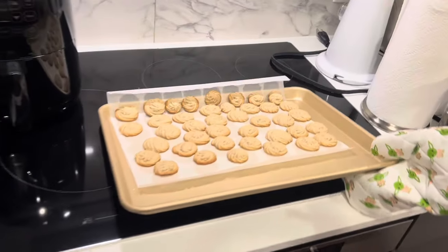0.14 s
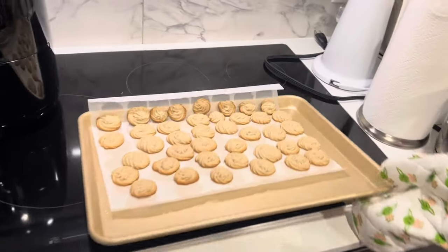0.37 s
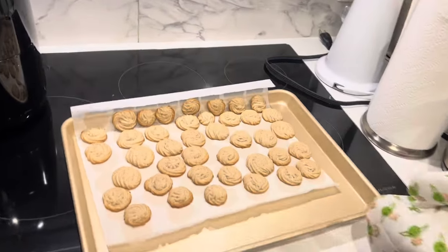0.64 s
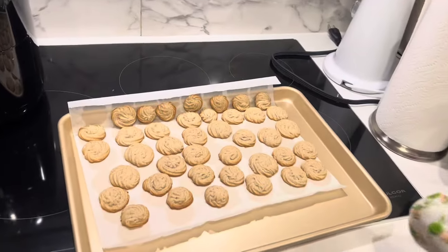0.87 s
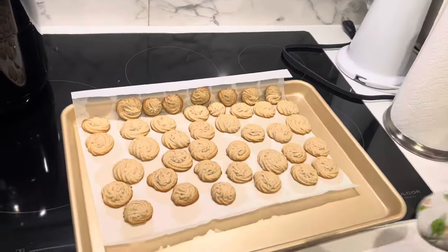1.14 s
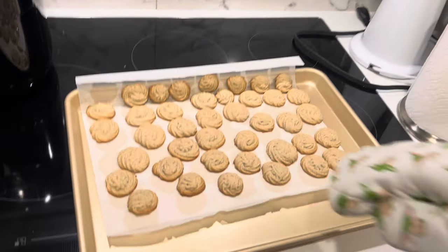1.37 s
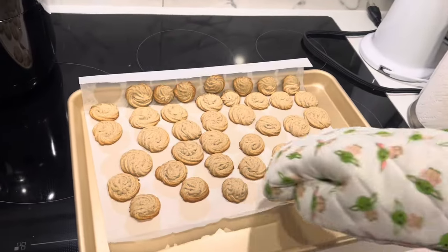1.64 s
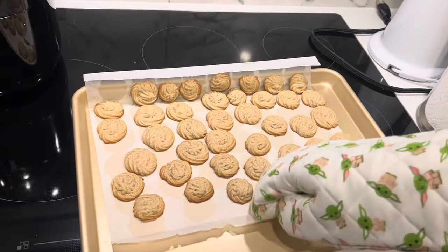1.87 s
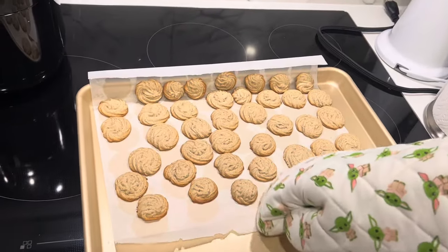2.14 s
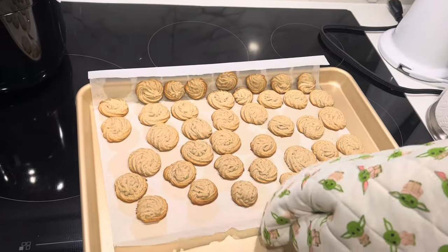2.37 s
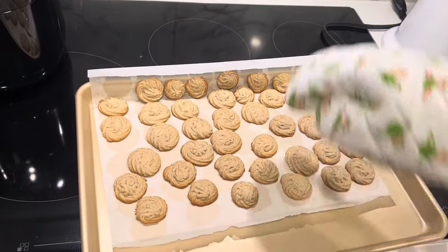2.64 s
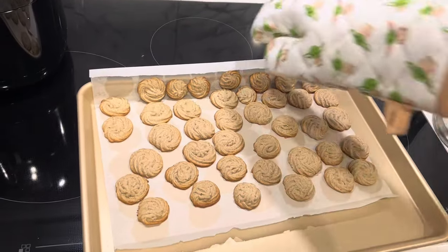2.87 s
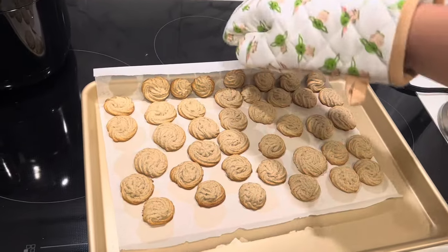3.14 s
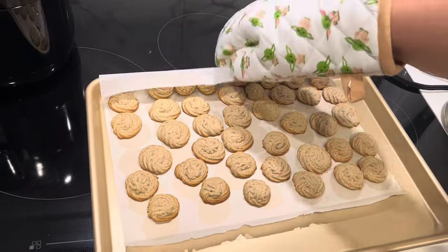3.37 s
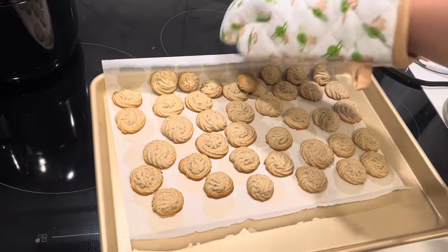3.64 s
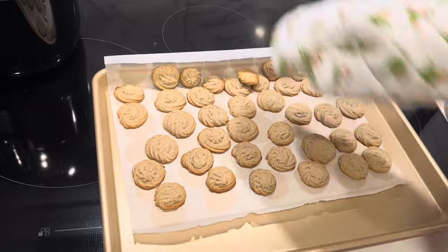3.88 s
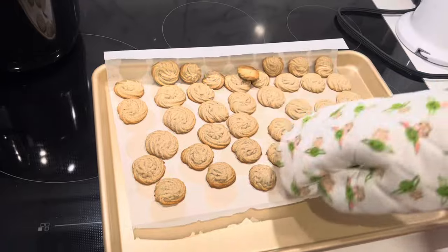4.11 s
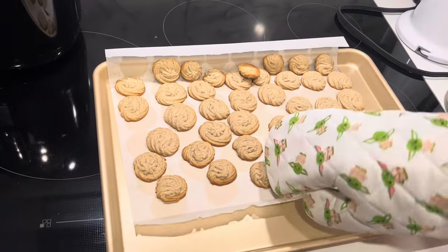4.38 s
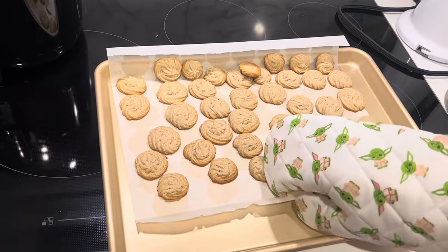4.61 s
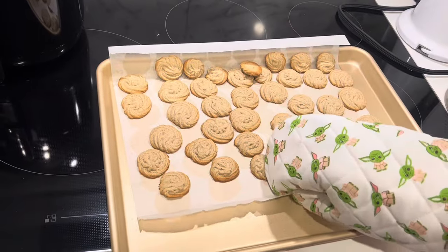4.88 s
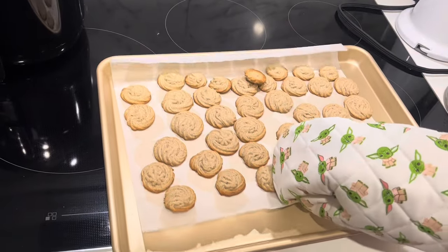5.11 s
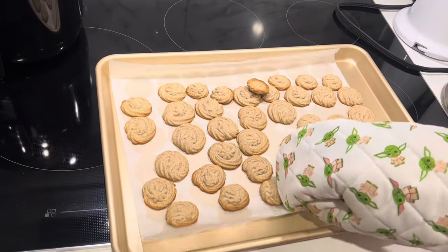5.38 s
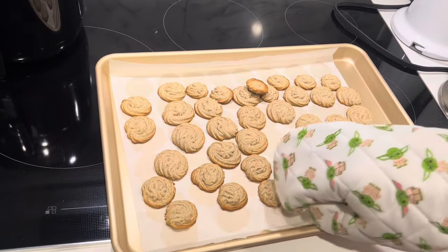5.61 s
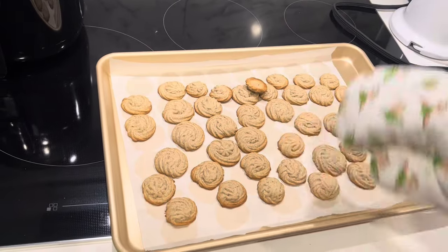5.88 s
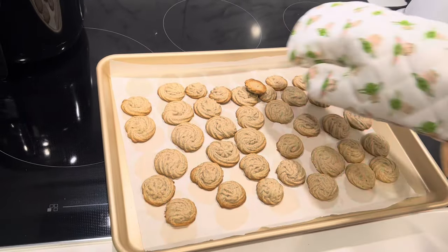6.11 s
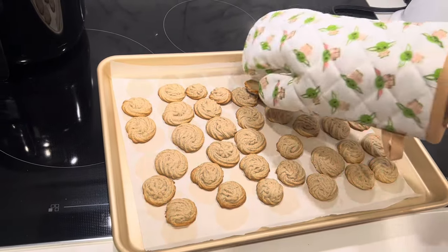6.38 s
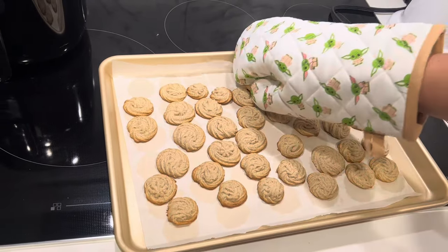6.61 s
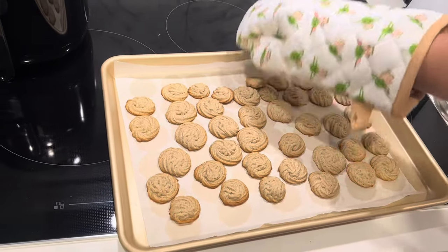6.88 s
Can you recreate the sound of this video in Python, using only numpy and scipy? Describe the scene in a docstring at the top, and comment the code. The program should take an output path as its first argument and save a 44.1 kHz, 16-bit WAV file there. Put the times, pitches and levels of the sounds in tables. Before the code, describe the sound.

A small hard-walled kitchen hisses quietly while fingers rumble softly on the handheld microphone. A metal baking sheet glides over glass and at about half a second drops with a very loud, bright clack that echoes briefly. After a pause, a padded mitt moves biscuits on baking paper: crisp crackles, short scrapes and light taps in separate bursts, with longer rustling near five seconds and a few quiet ticks at the end.

```python
"""A small kitchen hisses and a hand rumbles on the phone while a hot baking sheet glides over a glass cooktop.
At half a second the sheet drops flat with a clack: noisy blows ring its metal modes and the hard room echoes.
A faint steady tone near 3.5 kHz, a sine, follows. A padded mitt then nudges biscuits over baking paper:
crackles, short scrapes and taps, made of grainy noise in four bands, come in bursts up to the end.
Late on, a low wavering hum comes and goes."""
import sys
import numpy as np
from scipy import signal
from scipy.fft import rfft, irfft, next_fast_len
from scipy.io import wavfile
from scipy.ndimage import uniform_filter1d, map_coordinates

SR = 44100
rng = np.random.default_rng(int(sys.argv[2]) if len(sys.argv) > 2 else 0)


def boost_factor(decibels):
    """Convert a level in decibels to a linear amplitude factor."""
    exponent = np.asarray(decibels, float) / 20
    return 10 ** exponent


def unload_audio(sound):
    """Save the sound as a 16-bit wav file, at the path given as the first command line argument."""
    columns = np.transpose(np.atleast_2d(sound))
    # keep every value between -1 and 1, then stretch to whole-number steps
    steps = np.round(np.clip(columns, -1, 1) * 32767)
    wavfile.write(sys.argv[1], SR, steps.astype(np.int16))


N = 308700
T = np.arange(N) / SR
SIZE = next_fast_len(N + SR)  # room for a second of echo
HZ = np.fft.rfftfreq(SIZE, 1 / SR) + 1e-3  # just above zero, so that logs and divisions work

# what the free sheet rings with: f/Hz, width/Hz, level/dB
SHEET_MODES = [(251, 20, -4), (473, 39, 0), (664, 56, -10), (891, 69, -7.5), (1207, 49, -5.5),
               (1477, 66, -4.5), (1760, 220, -2), (1964, 180, 2.5), (2196, 99, 1), (2420, 130, 0.5),
               (2710, 100, 3), (2920, 99, 2), (4035, 120, -4), (4970, 120, -1.5), (6200, 330, -9),
               (6700, 220, -7.5), (7283, 150.7, -10)]
# paper pressed on the metal drums it; pulled taut it hardly does, and its creases go more slowly:
# t/s, drumming/dB, crease rise/ms
PAPER_CONTACT = [(0, -3, .3), (2.1, -7, 0.31), (2.3, -8, 1.2), (3.5, -9, 0.61), (4.7, -11.5, 0.37),
                 (5.0, -11.5, 1.6), (5.55, -20.5, 1.9), (5.8, -12, 0.31), (6.5, -1, 0.37)]
# how fast a stroke of the mitt, or a settling, swells
STROKE_RISE_DB_S = 900


def unit(x):
    """Scale to an rms of 1."""
    return x / np.sqrt(np.mean(x ** 2))


def curve(table):
    """Read the first two columns, time and value, at every sample."""
    return np.interp(T, *np.transpose(table)[:2])


def over_hz(table, hz=HZ):
    """Read a table of frequency and value on a log frequency axis."""
    f, value = np.transpose(table)
    return np.interp(np.log(hz), np.log(np.maximum(f, 1)), value)


def shape(x, response):
    """Filter by a frequency response."""
    return irfft(rfft(x, SIZE) * response, SIZE)[..., :N]


def modes(table):
    """Response of a body that rings at several pitches; neighbouring resonances have opposite sign."""
    total = 0
    for k, (f, width, db) in enumerate(table):
        resonance = 1j * HZ * width / (f * f - HZ ** 2 + 1j * HZ * width)
        total = total + (-1) ** k * boost_factor(db) * resonance
    return total


def band(lo_hz, hi_hz):
    """Soft-edged pass band."""
    return 1 / np.sqrt((1 + (lo_hz / HZ) ** 6) * (1 + (HZ / hi_hz) ** 6))


def walk(rate):
    """Smooth random curve, spread near 1: random levels held for 1 / rate s, then averaged twice."""
    hold = max(int(SR / rate), 1)
    steps = np.repeat(rng.standard_normal(N // hold + 1), hold)
    return 1.1 * uniform_filter1d(uniform_filter1d(steps, hold), hold)[:N]


def swell(start, length, db, rise_db_s, fall_db_s):
    """Gain that climbs to db at start, holds for length seconds and sinks away."""
    before = np.maximum(start - T, 0)
    after = np.maximum(T - start - length, 0)
    return boost_factor(db - rise_db_s * before - fall_db_s * after)


def slide():
    """Smooth metal on smooth glass: an even rush of noise, coloured by the singing glass."""
    # the glass top under the gliding rim: f/Hz, width/Hz, level/dB
    glass_modes = [(1810, 60, 12), (2300, 90, 8.5), (3095, 54, 12.5), (5090, 120, 8)]
    colour = abs(modes(glass_modes)) + boost_factor(4.5)
    colour = colour * (band(300, 8500) + boost_factor(-8.5) * band(13000, 14500))
    rush = shape(rng.standard_normal(N) * boost_factor(1.4 * walk(9.1)), colour)
    return unit(rush) * swell(0, 0.67, -60.5, rise_db_s=900, fall_db_s=200)


def kitchen():
    """Appliances: steady hiss that breathes a little, and late on a wavering low hum."""
    # colour of the hiss: f/Hz, level per Hz/dB
    hiss_colour = [(60, -47.5), (100, -10.5), (174, -8.5), (266, -11.5), (500, -20.5), (800, -28.5),
                   (1550, -27.5), (2040, -30.5), (2520, -39), (5300, -45), (7290, -27.5), (8800, -45.5),
                   (13000, -46.5), (14800, -54), (16000, -77.5)]
    # left-right difference (side) against the common part (mid): f/Hz, side minus mid/dB
    hiss_width = [(60, -21.5), (200, -12.5), (400, -8), (800, -6.5), (1400, 4.5), (2400, -7), (4400, -2),
                  (6000, -7.5), (7300, -18), (9000, -5.5), (15000, -7.5)]
    # the hiss dips briefly; rms of the common part, before the breathing: t/s, level/dB
    hiss_level = [(0, -60), (.5, -60.5), (1.2, -65.5), (2.6, -65.5), (4.2, -64.5), (5.05, -63.5),
                  (5.3, -63.5), (5.53, -75), (5.6, -66), (7, -67.5)]
    hum_hz = 170

    mid = shape(rng.standard_normal(N), boost_factor(over_hz(hiss_colour)))
    side = shape(rng.standard_normal(N), boost_factor(over_hz(hiss_colour) + over_hz(hiss_width)))
    breathing = boost_factor(curve(hiss_level) + 1.5 * walk(4.37))
    hiss = np.array([mid + side, mid - side]) / mid.std() * breathing

    hum_phase = 2 * np.pi * np.cumsum(hum_hz + 8 * walk(23)) / SR  # the pitch wavers
    hum = np.sqrt(2) * np.sin(hum_phase) * boost_factor(2.8 * walk(3.4))
    hum = hum * swell(5.62, 0.08, -67, rise_db_s=200, fall_db_s=10)
    hum = hum * swell(0, 6.2, 0, rise_db_s=0, fall_db_s=100)  # ends faster after 6.2 s
    return hiss + hum


def grip():
    """Fingers press and slip on the phone case: low rumble, nearly the same at both ports."""
    # the hand is tenser while reaching: t/s, level/dB
    grip_level = [(0, -64.5), (.9, -53), (1.4, -62), (2.6, -60), (3.5, -55), (4.05, -64.5), (4.55, -55.5),
                  (5.45, -70.5), (6.2, -73), (7, -65)]
    # colour of the rumble: f/Hz, level per Hz/dB
    grip_colour = [(15, -35.5), (28, -11.5), (40, -5), (54, -0.5), (72, 0.5), (113, -15), (200, -22),
                   (300, -45), (500, -100)]
    # fingers slip on the case: start t/s, length/s, level/dB
    slips = [(0, 0.0067, -39), (0.228, 0.017, -49.5), (0.461, 0.041, -52), (0.558, 0.019, -36),
             (1.494, 0.0095, -51), (1.81, 0.039, -60.5), (1.96, 0.0063, -49), (2.146, 0.023, -53.5),
             (2.52, 0.035, -59), (2.839, .09, -61), (2.973, 0.013, -50), (3.205, .03, -55),
             (3.267, 0.018, -50.5), (3.581, 0.026, -59.5), (4.606, 0.058, -45), (4.758, 0.019, -49),
             (4.963, 0.05, -75), (5.564, 0.2, -60.5), (6.406, 0.037, -63.5), (6.585, 0.023, -60),
             (6.636, 0.0071, -58.5), (6.99, .01, -59.5)]
    mid, side = (unit(shape(rng.standard_normal(N), boost_factor(over_hz(grip_colour)))) for _ in range(2))
    gain = boost_factor(curve(grip_level))
    for start, length, db in slips:
        gain = gain + swell(start, length, db, rise_db_s=400.5, fall_db_s=251)
    return gain * np.array([mid + boost_factor(-22.0) * side, mid - boost_factor(-16.5) * side])


def sheet():
    """Each contact chatters for a few ms and rattles on; this rings the sheet, and the push flexes it.
    Returns the sound towards the phone and the smoother sum over all directions that the walls hear."""
    # sheet on glass, landing and later pressed by the mitt:
    # t/s, clack peak/dB, chatter/ms, brightness/dB per octave, thud peak against clack/dB
    knocks = [(0.455, -37, 4.8, -4.5, 6), (.480, -28, 2.7, -7.5, 4), (.486, -34.5, 5.6, -7, 4),
              (0.497, -37.5, 5, -7, 13), (0.5346, -4, 2.1, -0.5, -20.5), (.538, -2.5, 2, 0, -19),
              (0.5409, -5.5, 1.5, -2.5, -19), (.545, -14.5, 6.2, -5, -14.5), (.561, -17, 5, -5.5, -5.5),
              (3.589, -40, 5.4, -7.5, 2), (3.636, -49.5, 3.6, -16, 1.5), (5.557, -38, 4.07, -5, -1.5),
              (6.724, -39.5, 2.05, -13.5, -0.5), (6.847, -51, 1.7, -9.5, 5.5)]
    # sheet and worktop flexing: f/Hz, width/Hz, level/dB
    thud_modes = [(83, 28, -6), (119, 36, -8), (187, 35, -4), (270.7, 29, -0.5)]
    # the clack averaged over all directions: f/Hz, relative level per Hz/dB
    all_round_colour = [(100, -13), (300, -5), (1000, -7), (2200, -2), (3300, -4.5), (5000, -3.5),
                        (7500, -9.5), (10000, -21), (15000, -21.5)]
    lying_damp = 1.5  # flat on the glass the modes widen
    rattle_db, rattle_t60_s = -15, 0.12  # biscuits and paper hop on after a landing

    ring = modes([(f, width * lying_damp, db) for f, width, db in SHEET_MODES]) + boost_factor(-11.0)
    flex = modes(thud_modes)
    clack_band = band(450, 7000) + boost_factor(-8.5) * band(11500, 11000)
    near, far = 0, 0
    for start, db, chatter_ms, tilt_db, thud_db in knocks:
        age = np.clip(T - start, 0, 1)
        part = age / (chatter_ms / 1000)
        touch = np.clip(part / 0.098, 0, 1) * np.exp(-part ** 3)
        rattle = np.clip(part, 0, 1) * boost_factor(rattle_db - 60 * age / rattle_t60_s) * (age < 1)
        edge_strike = 3.4 * (np.arange(N) == int(start * SR) + 8)  # one sharp click at the start
        force = (touch + rattle) * rng.standard_normal(N) + edge_strike
        tilt = boost_factor(tilt_db * np.log2(HZ / 2000 + 0.029))

        clack = shape(force, ring * tilt * clack_band)
        clack = boost_factor(db) * clack / abs(clack).max()
        thud = shape(touch, flex)
        thud = boost_factor(db + thud_db) * thud / abs(thud).max()
        click = 1.0 * (np.arange(N) == int(start * SR))
        blow = shape(click, tilt * boost_factor(over_hz(all_round_colour)))
        near = near + clack + thud
        far = far + unit(blow) * np.sqrt(np.mean(clack ** 2)) + thud
    return near, far


def rim(x):
    """The wide sheet reaches each port from many points: a few ms of late arrivals, different at each."""
    level_db, smear_ms = -7.5, 2.5
    late = rng.standard_normal((2, N)) * np.exp(-T * 1000 / smear_ms)
    late = late / np.sqrt(np.sum(late ** 2, axis=1, keepdims=True))
    return x + boost_factor(level_db) * shape(x, rfft(late, SIZE) * band(400, 9000))


def ringing(grit):
    """Grit on the paper drives the middle modes of the sheet, each swelling at its own moments."""
    total = 0
    for mode in SHEET_MODES[5:12]:
        total = total + boost_factor(3.5 * walk(22)) * shape(grit, modes([mode]))
    return unit(total)


def layers(grit, flurry_db):
    """One grainy push heard as drumming, body, middle and snap of the paper on the sheet."""
    # colour of the paper: f/Hz, relative level per Hz/dB
    paper_colour = [(120, -16.5), (250, -13), (500, -13), (1300, -8.5), (1800, -8.5), (2900, -13.5),
                    (3600, -12), (5000, -6), (6500, -4.5), (8100, -6.5), (9000, -8), (10000, -19.5),
                    (11300, -10), (13800, -9.5), (14600, -12.5), (15600, -45)]
    colour = boost_factor(over_hz(paper_colour))
    out = []
    for lo, hi in [(120, 950), (950, 3100), (3100, 5000), (5000, 16000)]:  # Hz
        # patches of different size buckle in turn, so the colour keeps shifting
        steps = np.geomspace(lo, hi, 4)
        patches = 0
        for a, b in zip(steps, steps[1:]):
            flurry = boost_factor(np.minimum(flurry_db * walk(60), 8))
            patches = patches + shape(grit * flurry, colour * band(a, b))
        out.append(unit(patches))
    out[1] = unit(out[1] + boost_factor(-1) * ringing(grit))  # the sheet rings under the paper
    return out


def rubbing():
    """Dense grains of uneven but bounded size, as when crumbs and fibres catch and slip."""
    # short swells of noise just before the clack, then strokes of mitt, paper and biscuits:
    # start t/s, length/s, level/dB, weight/dB
    strokes = [(0.483, 0.017, -63.5, 0.5), (0.517, 0.017, -56, 8), (1.868, 0.064, -65.5, 0.5),
               (2.006, 0.13, -57, -4), (2.152, 0.13, -63.5, -3), (2.324, 0.069, -52, -3),
               (3.321, 0.079, -46.5, 6), (3.443, 0.042, -59.5, 12), (3.541, 0.071, -53.5, 11.5),
               (4.412, 0.057, -70, 8), (4.512, 0.025, -63, 4.5), (4.555, 0.043, -72, 11.5),
               (4.638, 0.013, -55, 5), (4.72, 0.0062, -51.5, 2), (4.752, 0.013, -53.5, 3),
               (4.801, 0.12, -53, 0), (4.906, 0.029, -47, 4.5), (4.966, 0.079, -45, 4),
               (5.075, 0.223, -50.5, 3.5), (5.331, 0.045, -45.5, 1), (5.394, 0.14, -52, 4.5),
               (5.515, 0.0086, -46, 0), (5.555, 0.0054, -40.5, 1), (6.565, 0.017, -56, -1.5),
               (6.676, 0.014, -81, -12), (6.724, 0.034, -56, 1), (6.798, 0.079, -72.5, 1)]
    # paper and biscuits settle after a jolt: t/s, level/dB, fall/dB per s, weight/dB
    settles = [(0, -62.5, 154, 6), (.64, -59, 75, 9), (2.85, -68.5, 113, 7.5), (5.831, -62.5, 137, 4.5)]
    drum_per_weight = 1.17  # weight lifts the body dB for dB and the drumming a little more

    sizes_db = np.minimum(2.8 * rng.exponential(size=N), 16)
    flurries_db = np.clip(2.6 * walk(70) + 2 * walk(300), -12, 6)
    grit = rng.standard_normal(N) * boost_factor(sizes_db + flurries_db)
    drum, body, middle, snap = layers(grit, 3.2)
    drum = drum * boost_factor(curve(PAPER_CONTACT))
    out = 0
    for start, length, db, weight_db in strokes:
        mix = middle + 0.64 * snap + boost_factor(weight_db) * body + boost_factor(drum_per_weight * weight_db) * drum
        out = out + swell(start, length, db, STROKE_RISE_DB_S, fall_db_s=500) * mix
    for start, db, fall_db_s, weight_db in settles:
        mix = middle + 0.4 * snap + boost_factor(weight_db) * (body + drum)
        out = out + swell(start, 0, db, STROKE_RISE_DB_S, fall_db_s) * mix
    return out


def crackles():
    """A crease lets go: noisy snap, the body of the sheet dying a little later, then the paper relaxing."""
    # paper creases and biscuit taps, body (under 3.1 kHz) and snap (over 5 kHz) against the middle:
    # t/s, peak/dB, body/dB, snap/dB
    creases = [(1.021, -51, -3, -3.5), (1.871, -32.5, -5.5, 0), (1.92, -29, -2, 4), (1.98, -32, -10, -1),
               (2, -24, -22, -1), (2.052, -38, 0, 3), (2.09, -33, 4, -1), (2.274, -31.5, -0.5, 24),
               (2.311, -25.5, 10.5, 23), (2.33, -29, 6.5, 17), (2.353, -26.5, 4, 17),
               (2.367, -28.5, -1, 18.5), (2.39, -31, 0, 2.5), (2.843, -40.5, 1.5, -18),
               (3.301, -25, 10, 9.5), (3.325, -28, 12, 1), (3.344, -18, 8, 15.5), (3.368, -21, 9, 7.5),
               (3.41, -28.5, 31, -8), (3.445, -37, 4, 1), (3.522, -26, 7, 10), (3.539, -43, 12, 2.5),
               (3.558, -33, 12, 2), (3.579, -15, 13.5, 14), (3.592, -23, 12.5, 2), (3.605, -30, 7, 4),
               (3.637, -33.5, 18.5, -18), (3.657, -36, 20, -11.5), (4.634, -26, -8, -5),
               (4.679, -20.5, -1.5, -5.5), (4.713, -24, 7.5, -5), (4.744, -31.5, -19, -19),
               (4.799, -34, -2, -7), (4.817, -24.5, -2, -30), (4.826, -29.5, -6, -11), (4.848, -29, 0, -18),
               (4.877, -33, 2, 11), (4.905, -24, -2, 8), (4.922, -28, 10, -3), (4.968, -29, 6, 5),
               (4.983, -21, 6, 5), (5.029, -31, -10, 14), (5.046, -28, 10, -2), (5.09, -23, 9, 7.5),
               (5.224, -31.5, 0, 3), (5.257, -28.5, -12, 5), (5.34, -25, 0, 1), (5.364, -27, -2, -3),
               (5.381, -31, 4, -7), (5.399, -22, -1, 7), (5.406, -28, 2, -2), (5.445, -28.5, 3, 1),
               (5.483, -25, 5, 3.5), (5.51, -24.5, 1, 5), (5.551, -19, 4, -6), (5.571, -30, -9.5, 2),
               (5.823, -30.5, -1.5, -2.5), (6.551, -42, 4.5, 4.5), (6.562, -37, -6.5, 10.5),
               (6.713, -27.5, -1, 6.5), (6.727, -31, 6.5, 6.5), (6.845, -43, 9.5, -8.5)]
    snap_t60_s, body_t60_s = 0.045, 0.055
    linger_db, linger_t60_s = -20.5, 0.25  # the paper relaxes

    drum, body, middle, snap = layers(rng.standard_normal(N) * boost_factor(2.66 * walk(900)), 2.2)
    drum = drum * boost_factor(curve(PAPER_CONTACT))
    contact_s, _, contact_rise_ms = np.transpose(PAPER_CONTACT)
    out = np.zeros(N)
    for start, db, body_db, snap_db in creases:
        part = slice(int(start * SR), int(start * SR) + SR // 3)
        age = T[part] - T[part][0]
        rise_s = np.interp(start, contact_s, contact_rise_ms) / 1000
        first_slip = 1 + 1.17 * np.exp(-age / (0.0018 + rise_s))  # the first slip is the hardest
        rise = (1 - np.exp(-age / rise_s)) * first_slip
        fast = rise * boost_factor(-60 * age / snap_t60_s)
        slow = rise * boost_factor(-60 * age / body_t60_s)
        bright = middle[part] + boost_factor(snap_db) * snap[part]
        deep = boost_factor(body_db) * (body[part] + drum[part])
        linger = boost_factor(linger_db - 60 * age / linger_t60_s) * (middle[part] + body[part])
        crackle = fast * bright + slow * deep + linger
        out[part] += boost_factor(db) * crackle / abs(crackle).max()
    return out


def faint_tone():
    """A faint steady tone near 3.5 kHz: one sine at a fixed pitch, its level moving slightly."""
    tone = np.sqrt(2) * np.sin(2 * np.pi * 3510 * T) * boost_factor(1.1 * walk(13))
    return tone * swell(1.16, 0.6, -84, rise_db_s=151, fall_db_s=8)


def drags():
    """The soft mitt drags the sheet: cloth friction without grains makes its modes hum unevenly."""
    # drags that do not crease the paper: start t/s, length/s, level/dB
    pulls = [(4.422, .03, -70), (4.51, .035, -57)]
    colour = abs(modes(SHEET_MODES[3::7])) + 0.1 * band(800, 3000)
    hum = unit(shape(rng.standard_normal(N) * boost_factor(2.5 * walk(40)), colour))
    return hum * sum(swell(start, length, db, 400, 150) for start, length, db in pulls)


def wander(x):
    """Small sounds come from shifting places: louder and earlier at one port, then at the other."""
    level_db, lead_ms = 1.5, 0.016  # typical difference between the ports
    place = walk(6.4) * np.array([[0.5], [-0.5]])
    read_at = np.arange(N) + place * lead_ms * SR / 1000
    return boost_factor(level_db * place) * np.array([map_coordinates(x, [at], mode="mirror") for at in read_at])


def room(x):
    """Dense echoes of tile and glass, each octave fading at its own rate, partly alike at both ports."""
    # time to fade by 60 dB: f/Hz, fade/s
    fade_time = [(100, 0.78), (500, 0.5), (2000, 0.54), (5000, 0.53), (12000, 0.25)]
    # echo power common to both ports: f/Hz, share
    alike_share = [(100, 1), (400, 0.36), (1500, 0.38), (8000, 0.3)]
    t, echo = T[:SR], 0
    for hz in 63 * 2.0 ** np.arange(9):
        noise = shape(rng.standard_normal((3, N)), band(hz / 1.6, hz * 0.99))
        common, left, right = noise[:, :SR]
        alike = np.clip(over_hz(alike_share, hz), 0, 1)
        octave = np.sqrt(alike) * common + np.sqrt(1 - alike) * np.array([left, right])
        echo = echo + octave * boost_factor(-60 * t / over_hz(fade_time, hz))
    echo = echo * np.clip(t / 0.0036 - 0.5, 0, 1)  # silent for 1.8 ms, full from 5.4 ms
    echo = echo / np.sqrt(np.sum(echo ** 2) / 2)
    return boost_factor(-13.5) * shape(x, rfft(echo, SIZE))


def scene():
    """Near sounds come direct, then return from the walls; the steady sounds and the hand are added."""
    lean_db = 0.88  # near sounds sit a little left
    paper_room_db = -5.5  # small sounds inside the rim of the sheet reach the walls less
    metal, metal_all_round = sheet()
    small = slide() + rubbing() + crackles() + drags()
    direct = (rim(metal) + wander(small)) * boost_factor(np.array([[lean_db], [-lean_db]]) / 2)
    echoes = room(metal_all_round + boost_factor(paper_room_db) * small)
    return direct + echoes + kitchen() + faint_tone() + grip()


def top_cut(x):
    """Nothing passes above the cut-off."""
    return signal.sosfilt(signal.butter(12, 16500, fs=SR, output="sos"), x)


def record(dry):
    """Two microphone ports hear each pitch out of step; the phone clips at full scale."""
    # the ports are opposed near 10 kHz: f/Hz, left lead/rad
    port_lead = [(100, 0.08), (1100, 0.73), (1600, 0.85), (2600, 0.99), (4500, 1.5), (5600, -1.87),
                 (7300, 0.5), (8200, -0.25), (9150, -3), (10900, -4), (11800, -4.5), (14000, -6),
                 (15500, -10)]
    turn = np.exp(0.5j * np.outer([1, -1], over_hz(port_lead)))  # half the lead on each side
    mix = np.clip(shape(dry, turn), -1, 1)
    return top_cut(mix)


dry = scene()
out = record(dry)
unload_audio(out)
```